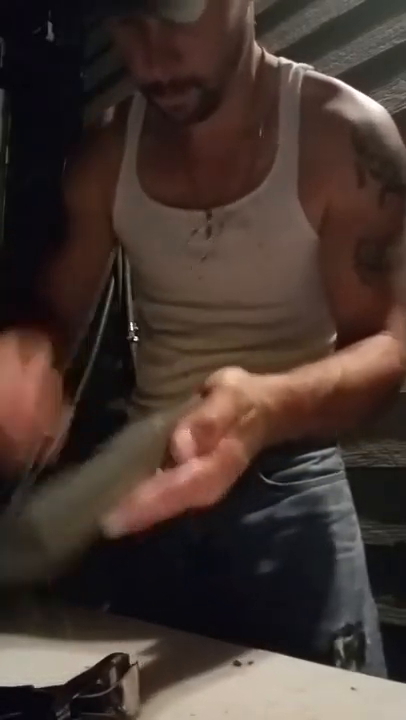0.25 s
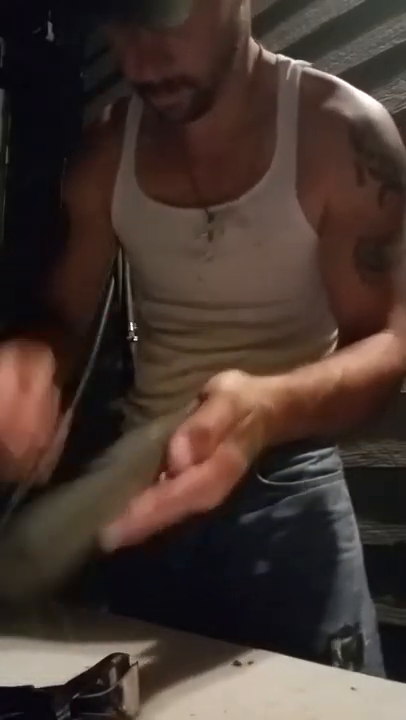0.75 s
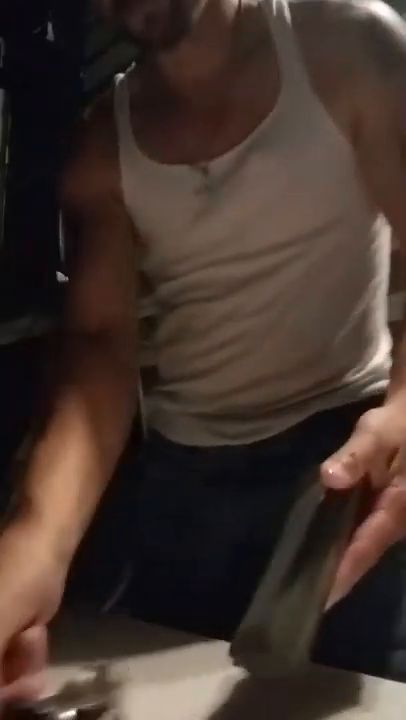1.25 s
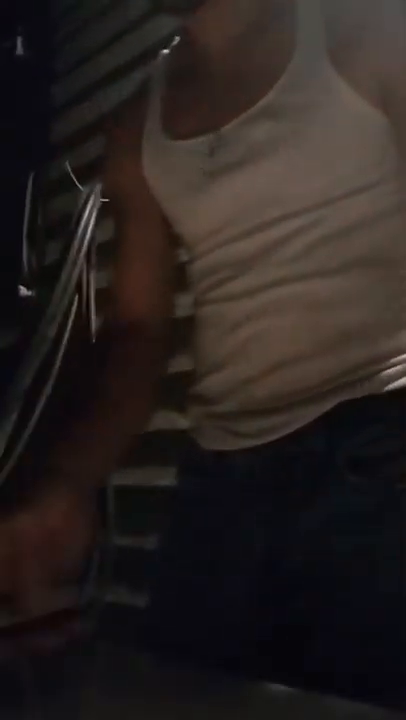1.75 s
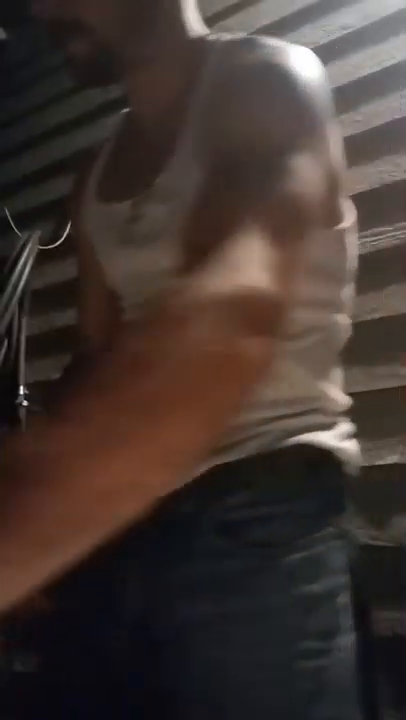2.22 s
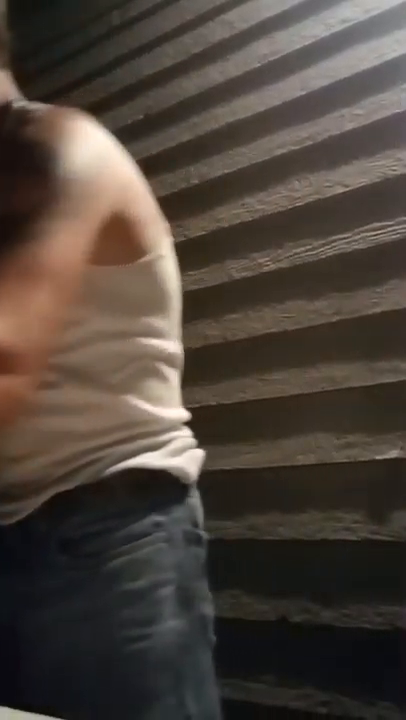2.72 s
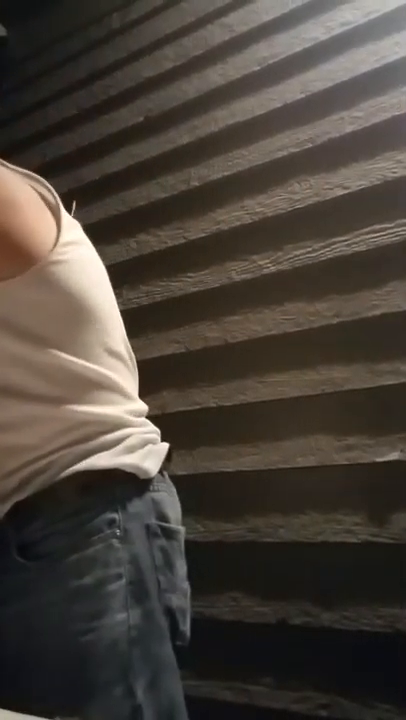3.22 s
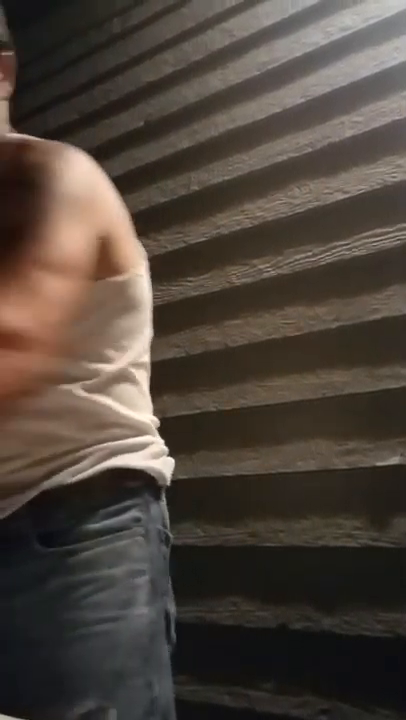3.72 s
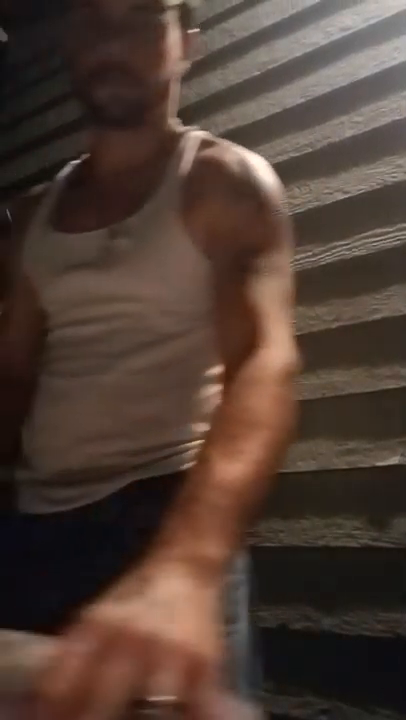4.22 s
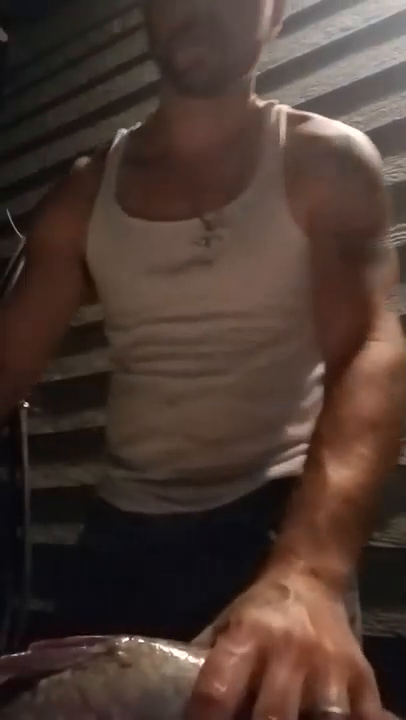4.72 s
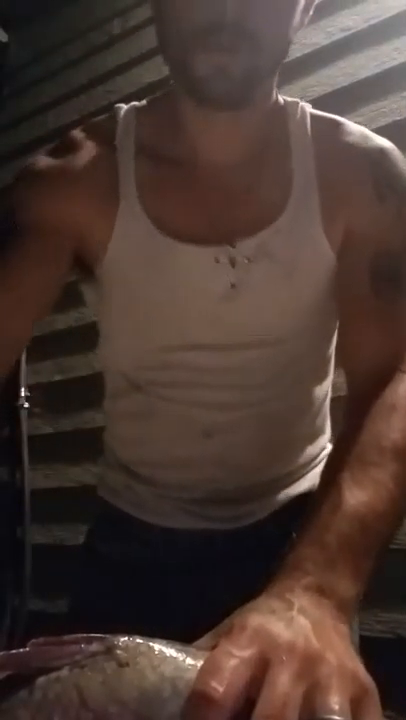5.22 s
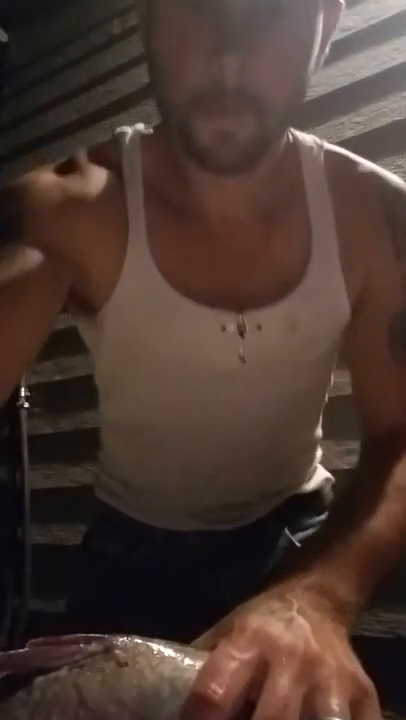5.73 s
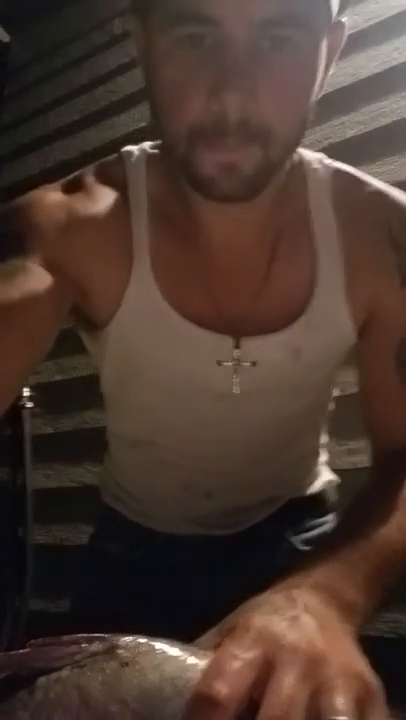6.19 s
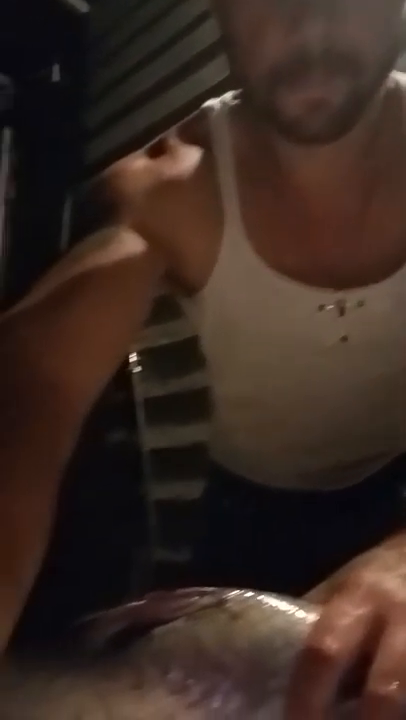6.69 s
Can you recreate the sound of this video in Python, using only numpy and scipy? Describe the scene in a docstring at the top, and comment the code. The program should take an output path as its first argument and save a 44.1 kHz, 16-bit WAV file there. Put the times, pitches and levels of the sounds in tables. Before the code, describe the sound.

Outdoors at night, insects shrill throughout over a distant motor's low hum. In the first second a knife rasps along a whetstone in four quick, gritty strokes with a slight steel ring. From about 1.2 to 2 seconds knife and stone clatter onto a booming table, loudest near 1.5 and 1.9 seconds, with short scuffs and one clink. At 2.3 seconds scales snap, and a large fish is shoved across the top with a rumbling, chattering rub that rattles loose things. Soft bumps follow near 3.1 and 3.5 seconds. The fish is pulled near with a scrape and crisp little snaps until about 4.5 seconds, then slaps down loudly and wetly at 4.8. Faint wet rubbing, two tiny squeaks and soft squishes follow until about 6.6 seconds. The microphone is close, on the table, with sounds leaning right; the background dips briefly after loud blows.

```python
"""Outdoors at night, at a fish-cleaning table: a knife rasps four times along a hand-held whetstone.
Knife and stone clatter down on the booming table top. A large fish is shoved away and pulled near, its
scales catching and slipping; it flops down wetly and a hand grips it. Insects shrill throughout over a
distant motor's hum. All is heard from a camera on the table: its right microphone port is the nearer
one, and its gain ducks after loud blows."""
import sys
import numpy as np
from scipy import signal
from scipy.fft import rfft, irfft, next_fast_len
from scipy.io import wavfile
from scipy.ndimage import uniform_filter1d, minimum_filter1d, map_coordinates

SR = 44100
rng = np.random.default_rng(int(sys.argv[2]) if len(sys.argv) > 2 else 0)


def wav_out(sig):
    """Save sig, one row per channel (or a flat mono array), as 16-bit PCM at SR to the path in sys.argv[1]."""
    wavfile.write(sys.argv[1], SR, np.round(np.clip(np.atleast_2d(sig).T, -1, 1) * 32767).astype(np.int16))


N = 306495

# Levels in the tables are relative; each layer sets its own gain.
# bands of the insect chorus: f/Hz, width/Hz, level/dB
INSECT_BANDS = [(2327, 54, -2.5), (3044, 257, -7), (4850, 760, -15), (6371, 317, 2), (6500, 310, 2.5)]
# far air and the motor's tones: f/Hz, level/dB
AIR_SPECTRUM = [(15, -56), (25, -24), (36, -14), (53, -0.5), (194, -7.5), (299, -4.5), (382, -10),
                (513, -10), (1640, -19.5), (2330, -12), (3680, -29), (5670, -24.5), (6490, -4.5),
                (7220, -29.5), (15800, -35.5)]
MOTOR_TONES = [(58, -3.5), (90, -6.5), (119, -5)]

# blade strokes: t/s, length/s, level/dB, mid-stroke swell/dB, fizz against the rasp/dB
STROKES = [(0.114, 0.086, -27, -4.5, -1.5), (0.374, 0.061, -23, 2.5, -2), (0.625, 0.078, -27.5, -9.5, -5),
           (0.87, 0.045, -22, 16, -5.5)]
# stone on steel: f/Hz, level/dB
GRIT_SPECTRUM = [(700, -8), (1200, -8), (2000, -11.5), (3000, -8), (5000, -4.5), (6100, 0.5), (7400, -7),
                 (8500, 3.5), (9600, -4), (10800, -8), (12500, -9), (15500, -7.5)]
# the blade's body and the steel's high modes: f/Hz, width/Hz, level/dB
BLADE_MODES = [(2720, 190, -8), (3320, 180, 0.5), (3600, 120, -1), (3670, 69, 4.5), (3940, 90, -5),
               (4110, 86, 2.5), (4510, 69, -14), (5800, 54, 1)]
EDGE_MODES = [(8700, 59, -21), (11470, 70, -6), (13400, 92, -3), (14100, 100, 0), (14505, 100, -21),
              (15240, 240, 5), (15430, 190, 9), (15450, 92, 10)]

# blows of stone and knife, and of the fish: t/s, force/dB, boom depth/dB, contact hardness/dB
KNOCKS = [(1.178, -16, 0, -17), (1.286, -9.5, 6.5, -11), (1.313, -2, -3, -6), (1.346, -8, -1, -4),
          (1.499, 13.5, -5, -1), (1.535, 5, -4, -1), (1.566, -2.5, -6, 10), (1.606, -4, -2, 0),
          (1.645, -9, -2, 1), (1.750, 3.5, 4, -1), (1.772, -4, 9, -2), (1.841, -11.5, 9.5, 1),
          (1.910, 11, -1, 5.5), (1.932, 15, -0.5, -5), (1.948, 9.5, -1, -1), (1.972, 3.5, 4, 7.5),
          (2.000, -2, 0, 7), (2.027, -11.5, 6, 17.5)]
FLOPS = [(3.149, -13, 4, -13), (3.494, -9.5, 2, -11), (3.519, -16, 6.5, -4), (4.779, 12.5, -5, -0.5),
         (4.846, 5, -8, -12.5), (4.900, 0, 0.5, 0)]
# the table top bare, the same under the fish, and the knife touching down: f/Hz, level/dB, t60/s
TABLE_MODES = [(80, -7, 0.18), (126.6, -1, 0.084), (158.3, 2.5, 0.15), (222, -3, 0.11), (303, 8.5, 0.14),
               (460, -1.5, 0.041), (555, -1.5, 0.11), (690, -7.5, 0.017)]
LOADED_TABLE_MODES = [(81.7, -9, 0.57), (114.7, -2.5, 0.44), (169, 6, 0.15), (253, -15, 0.081),
                      (334, -0.5, 0.073), (490, -12, 0.068), (650, -0.5, 0.086), (701, 8, 0.037)]
CLINK_MODES = [(3760, 8, 0.018), (4050, -17, 0.025), (5860, -9, 0.046), (7400, -27, 0.026)]
# the table's denser modes, a hard contact and its bright click: f/Hz, level/dB
THUD_SPECTRUM = [(120, -50), (200, 7), (273, -2), (313, -3.5), (370, -5.5), (424, -3.5), (976, -19),
                 (1500, -17), (1950, -43), (3300, -120)]
CLACK_SPECTRUM = [(410, -3.5), (700, -12), (861, -1), (1570, -1.5), (2130, -10), (2420, -6.5), (3140, -42),
                  (3590, -15), (6000, -43), (7800, -60), (13200, -120)]
CLICK_SPECTRUM = [(2500, -11), (4500, 3), (6500, -5), (8300, 5), (10500, -24), (16000, -6.5)]
# loose things on the table: f/Hz, width/Hz, level/dB
RATTLE_MODES = [(2503, 160, -5), (2840, 49, -3), (3020, 16, 1.5), (3320, 150, -6)]
# knife and stone sliding: t/s, length/s, table rumble/dB, scuff/dB
SCUFFS = [(1.266, 0.13, -19, -30.5), (1.525, 0.19, 2, -8), (1.778, .055, -7, -8)]

# snaps of scales and fins: t/s, level/dB
SNAPS = [(2.308, -13.5), (2.339, 1), (3.951, -12.5), (4.158, -5.5), (4.217, -4.5), (4.238, -7.5),
         (4.321, -3.5), (6.397, -23), (6.487, -15), (6.545, -19)]
# envelopes of the two drags: t/s, rub/dB, table rumble/dB
SHOVE_ENVELOPE = [(2.36, -46, -28), (2.46, -27, -23), (2.77, -21, -19), (2.82, -27, -16.5),
                  (2.89, -22, -17.5), (2.98, -27, -22.5), (3.07, -25, -20.5), (3.18, -33, -21),
                  (3.32, -47.5, -41.5), (3.46, -71, -73)]
PULL_ENVELOPE = [(3.55, -47.5, -32.5), (3.72, -40.5, -40), (3.88, -32, -50), (3.955, -23.5, -43),
                 (4.0, -28, -37), (4.10, -21, -36.5), (4.205, -31, -32), (4.23, -22.5, -28),
                 (4.37, -30, -32), (4.6, -45, -40), (4.7, -51, -37), (4.77, -57, -54)]
# each drag's table rumble and scale rub: f/Hz, level/dB
SHOVE_RUMBLE = [(100, -5), (170, 1), (300, 0), (430, -3.5), (620, -5), (800, -9), (1100, -16)]
SHOVE_RUB = [(380, -7), (650, -14.5), (1010, -1.5), (1250, -7), (1510, -4.5), (2060, -13), (2500, -3.5),
             (3320, -20), (3740, -19), (5800, -19.5), (7540, -39), (12800, -120)]
PULL_RUMBLE = [(35, -52), (60, -2), (140, -11), (189, 5.5), (248, -7.5), (336, -4), (465, -12.5),
               (800, -24), (1040, -9.5), (1760, -120)]
PULL_RUB = [(350, -29), (600, -10.5), (720, -15), (863, -7.5), (1100, -7.5), (1590, -2), (1720, -6),
            (1910, -3.5), (2100, -14.5), (2490, -4), (2830, -13), (3590, -9), (4140, -19), (5900, -25),
            (7670, -55), (13000, -120)]
# a snap, the hiss of wet skin and the body's slap: f/Hz, level/dB
SNAP_SPECTRUM = [(300, 0.5), (1200, -3), (2600, 4.5), (4500, -3.5), (6500, -9.5), (8500, -5.5),
                 (11000, -27), (16000, -10)]
WET_SPECTRUM = [(3500, -20), (5500, -15.5), (7200, -1.5), (8400, 5), (10500, -18.5), (13000, -12.5),
                (15500, -5)]
SLAP_SPECTRUM = [(150, -4), (270, 4), (450, 5), (700, -4.5), (1000, -12.5), (1500, -12.5)]
# scales singing on the table top: f/Hz, width/Hz, level/dB
SCALE_MODES = [(1260, 117, 1.5), (1474, 100, 2), (1602, 54, 6), (1940, 53, -5), (3970, 210, -5),
               (4660, 820, -10)]
# spells of skin chatter, hand rub and finger pressure: middle t/s, half length/s, level/dB
CHATTER_SPELLS = [(2.482, 0.033, -9.5), (2.66, 0.19, -18.5), (3.15, 0.11, -31)]
GRIPS = [(5.02, 0.089, -48), (5.48, 0.18, -48), (5.82, 0.06, -50.5), (6.41, .04, -48), (6.54, 0.036, -60)]
SQUISHES = [(6.41, 0.076, -43.5), (6.53, 0.066, -38)]
# faint squeaks: t/s, f/Hz, level/dB
SQUEAKS = [(5.221, 1710, -36), (5.247, 1690, -35.5)]

# stereo likeness of far and near sounds: f/Hz, left-right correlation
OPEN_ALIKE = [(100, 0.95), (500, 1), (1200, 0.24), (2500, 0.024)]
NEAR_ALIKE = [(100, 0.89), (500, 0.64), (1400, 0.15), (3000, 0.55)]
# pan of the surroundings, the table and the whetstone: f/Hz, left minus right/dB
OPEN_PAN = [(100, 0), (500, -4), (2000, -4), (6500, -7.5), (14000, -3)]
TABLE_PAN = [(100, 0.5), (400, -8), (1500, -12), (3500, -7), (8000, -19), (14000, -8)]
STONE_PAN = [(1500, -3), (4000, -2), (8000, -11), (15000, -7.5)]
# decay of the reflections from wall and eaves: f/Hz, t60/s
WALL_DECAY = [(150, 0.23), (600, 0.061), (3000, 0.09), (12000, 0.033)]


def amp(db):
    """Decibels to gain."""
    return 10 ** (np.asarray(db) / 20)


def clock():
    """The time of every sample."""
    return np.arange(N) / SR


def along(points, hz):
    """Read (f/Hz, value) points on a log axis."""
    f, value = np.transpose(points)
    return np.interp(np.log(hz + 1), np.log(f + 1), value)


def wobble(rate):
    """A smooth random curve, rate knots a second."""
    return map_coordinates(rng.standard_normal(int(N * rate / SR) + 4), [clock() * rate])


def filtered(x, response):
    """Shape x with a frequency response."""
    size = next_fast_len(N + SR // 2)
    return irfft(rfft(x, size) * response(np.fft.rfftfreq(size, 1 / SR)), size)[..., :N]


def colour(points):
    """An EQ curve through (f/Hz, level/dB) points, falling steeply beyond its ends."""
    low, high = points[0][0], points[-1][0]
    return lambda f: amp(along(points, f)) * np.minimum(f / low, 1) ** 3 / np.maximum(f / high, 1) ** 3


def resonances(modes):
    """A bank of (f/Hz, width/Hz, level/dB) resonators of alternating polarity."""
    return lambda f: sum((-1) ** k * amp(db) * 1j * f * width / (hz * hz - f * f + 1j * f * width)
                         for k, (hz, width, db) in enumerate(modes))


def ports(balance_db):
    """Left and right gains for a level difference."""
    left = np.atleast_1d(amp(balance_db))
    return np.array([left, np.ones_like(left)]) * 2 / (1 + left)


def patches(x, depth_db):
    """Shifting contact points favour now these, now those frequencies."""
    spectra = signal.stft(x, nperseg=1024)[2]
    field = uniform_filter1d(rng.standard_normal(spectra.shape[1:]), size=4, axis=0)
    field = uniform_filter1d(field, size=3, axis=1)
    return signal.istft(spectra * amp(depth_db * field / field.std()), nperseg=1024)[1][:, :N]


def texture(response, pan, grain_db=0, patchy_db=0, alike=NEAR_ALIKE):
    """Stereo noise with a mid of rms 1: micro-impacts of uneven size excite a response."""
    def mid_side(f):
        angle = np.arccos(np.clip(along(alike, f), -1, 1)) / 2
        return response(f) * np.array([np.cos(angle), np.sin(angle)])

    impacts = rng.standard_normal((2, N)) * amp(grain_db * wobble(1500))
    if patchy_db:
        impacts = patches(impacts, patchy_db)
    mid, side = filtered(impacts, mid_side)
    stereo = filtered(np.array([mid + side, mid - side]), lambda f: ports(along(pan, f)))
    return stereo / np.sqrt(np.mean(stereo.mean(0) ** 2) + 1e-20)


def add(track, start, sound):
    """Mix a sound into a track at start seconds."""
    part = track[..., round(start * SR):][..., :sound.shape[-1]]
    part += sound[..., :part.shape[-1]]


def faders(rows):
    """One gain curve for each dB column, silent outside the rows' times."""
    times, *columns = np.transpose(rows)
    return [amp(np.interp(clock(), times, db, left=-120, right=-120)) for db in columns]


def swells(rows):
    """The envelope of smooth (t/s, half length/s, level/dB) swells."""
    return sum(amp(db) * np.exp(-((clock() - middle) / half) ** 2) for middle, half, db in rows)


def blows(times, levels_db, t60, attack):
    """The envelope of blows that each rise fast and die away; their powers add."""
    power, t = np.zeros(N), np.arange(SR // 2) / SR
    for start, db in zip(times, levels_db):
        add(power, start, (amp(db - 60 * t / t60) * (1 - np.exp(-t / attack))) ** 2)
    return np.sqrt(power)


def ring(modes, scatter_db, detune):
    """One strike of (f/Hz, level/dB, t60/s) modes, weighted anew by where it lands."""
    t = np.arange(SR // 2) / SR
    chance = rng.standard_normal((len(modes), 2))
    return sum(amp(db + scatter_db * lift - 60 * t / t60) * np.sin(2 * np.pi * hz * (1 + detune * bend) * t)
               for (hz, db, t60), (lift, bend) in zip(modes, chance))


def night():
    """The bed: a flickering insect chorus, far air and a distant motor's wavering hum."""
    insects = texture(resonances(INSECT_BANDS), OPEN_PAN, grain_db=2, alike=OPEN_ALIKE)
    insects *= amp(1.84 * wobble(45))
    air = texture(colour(AIR_SPECTRUM), OPEN_PAN, alike=OPEN_ALIKE)
    hum = sum(np.sin(2 * np.pi * hz * clock() + 0.66 * wobble(12)) * amp(db + 2.7 * wobble(12))
              for hz, db in MOTOR_TONES)
    return amp(-44 + 0.5 * wobble(2.45)) * (amp(1) * insects + amp(4) * air + amp(1.5) * hum)


def sharpening(attack_s=0.0024, release_t60=0.072):
    """The blade taps the stone, then grit rasps along the edge and rings the steel."""
    rasp, body, fizz = np.zeros((3, N))
    for start, length, level_db, swell_db, fizz_db in STROKES:
        t = clock() - start
        pressure_db = swell_db * (np.sin(0.85 * np.pi * np.clip(t / length, 0, 1) ** 1.17) - 0.5)
        release_db = 60 * np.maximum(t - length, 0) / release_t60
        contact = np.clip(t / attack_s, 0, 1) * amp(level_db + pressure_db - release_db)
        rasp += contact
        body += amp(-8.5 + 0.17 * swell_db) * contact  # pressing harder rings the steel more
        fizz += amp(fizz_db) * contact
    times, _, level_db, swell_db, _ = np.transpose(STROKES)
    tap_db = level_db + 8.5 - 0.16 * swell_db  # a stroke that swells later lands more lightly
    tap = blows(times, tap_db, t60=0.013, attack=0.00027)
    return ((rasp + tap) * texture(colour(GRIT_SPECTRUM), STONE_PAN, grain_db=4.5, patchy_db=2.5)
            + (body + amp(-5) * tap) * texture(resonances(BLADE_MODES), STONE_PAN, grain_db=3.5)
            + (fizz + amp(-4) * tap) * texture(resonances(EDGE_MODES), STONE_PAN))


def rebounds(rows, flight_s, loss_db, soften_db, count):
    """Each landing becomes count quick contacts, weaker and softer as the thing rocks to rest."""
    return [(start + k * flight_s, force - k * loss_db, depth, hardness - k * soften_db)
            for start, force, depth, hardness in rows for k in range(count)]


def table_hits(rows, modes, thud_spectrum, boom_db, knock_db, thud_db, click_db, thud_t60, clack_t60):
    """Each blow booms and thuds in the table top; hard contacts add a clack, a rattle and a click."""
    times, force_db, depth_db, hardness_db = np.transpose(rows)
    boom = np.zeros(N)
    for start, force, depth in zip(times, force_db, depth_db):
        shelf = [(190, depth + boom_db), (300, knock_db)]  # deep blows favour low modes: f/Hz, level/dB
        struck = [(hz, force + db + along(shelf, hz), t60) for hz, db, t60 in modes]
        add(boom, start, ring(struck, scatter_db=1.5, detune=0.017))
    thud = blows(times, force_db + thud_db, t60=thud_t60, attack=0.0015)
    clack = blows(times, force_db + hardness_db - 15.5, t60=clack_t60, attack=0.00042)
    click = blows(times, force_db + hardness_db + click_db, t60=0.021, attack=0.00022)
    return (ports(-5.5) * boom
            + thud * texture(colour(thud_spectrum), TABLE_PAN, patchy_db=5)
            + clack * texture(colour(CLACK_SPECTRUM), TABLE_PAN, grain_db=2.5)
            + amp(-2.5) * clack * texture(resonances(RATTLE_MODES), OPEN_PAN)
            + click * texture(colour(CLICK_SPECTRUM), TABLE_PAN, grain_db=-2.5))


def clatter(clink_at_s=1.8435):
    """Stone and knife land and rock on the table; the steel clinks once."""
    clink = np.zeros(N)
    add(clink, clink_at_s, amp(-10) * ring(CLINK_MODES, scatter_db=1, detune=0.0017))
    contacts = rebounds(KNOCKS, flight_s=0.00783, loss_db=6, soften_db=1.5, count=2)
    knocks = table_hits(contacts, TABLE_MODES, THUD_SPECTRUM, boom_db=-10, knock_db=-22,
                        thud_db=-8, click_db=-21, thud_t60=0.11, clack_t60=0.025)
    return ports(-8.5) * clink + knocks


def scuffs(attack_s=0.0087, fade_db_per_s=93, release_t60=0.16):
    """Stone and knife slide a little, lose speed and stop, and loose things buzz."""
    rumble, scuff = np.zeros((2, N))
    for start, length, rumble_db, scuff_db in SCUFFS:
        t = np.maximum(clock() - start, 0)
        release_db = 60 * np.maximum(t - length, 0) / release_t60
        slide = np.minimum(t / attack_s, 1) * amp(-fade_db_per_s * t - release_db)
        rumble += amp(rumble_db) * slide
        scuff += amp(scuff_db) * slide
    table_top = resonances([(hz, np.log(1000) / np.pi / t60, db) for hz, db, t60 in TABLE_MODES])
    return (amp(-4.5) * rumble * texture(table_top, TABLE_PAN, grain_db=2.5)
            + amp(-5.5) * scuff * texture(colour(CLACK_SPECTRUM), TABLE_PAN, grain_db=-0.5, patchy_db=3)
            + amp(-10) * scuff * texture(resonances(RATTLE_MODES), OPEN_PAN, grain_db=6.5)
            + amp(-18) * scuff * texture(colour(CLICK_SPECTRUM), TABLE_PAN, grain_db=6.5))


def fin_snaps():
    """Scales and fins snap in tiny, crisp bursts."""
    times, level_db = np.transpose(SNAPS)
    bursts = blows(times, level_db - 6.5, t60=0.008, attack=0.0001)
    return bursts * texture(colour(SNAP_SPECTRUM), TABLE_PAN)


def drag(envelope, rumble_spectrum, rub_spectrum, slip_db, rumble_db, rub_db, hiss_db):
    """Scales catch and slip on the table top, which rumbles under them; a wet hiss follows the rub."""
    rub, rumble = faders(envelope)
    rub *= amp(-0.5 * wobble(16))  # a drag never runs evenly
    table = texture(colour(rumble_spectrum), TABLE_PAN, grain_db=slip_db, patchy_db=3.5)
    scales = texture(colour(rub_spectrum), TABLE_PAN, grain_db=slip_db, patchy_db=3.5)
    wetness = amp(hiss_db + wobble(13))  # the skin is wetter in some places
    hiss = texture(colour(WET_SPECTRUM), TABLE_PAN, grain_db=4)
    return amp(rumble_db) * rumble * table + rub * (amp(rub_db) * scales + wetness * hiss)


def shove():
    """The fish is shoved away, shaking loose things on the table."""
    slide = drag(SHOVE_ENVELOPE, SHOVE_RUMBLE, SHOVE_RUB,
                 slip_db=2.5, rumble_db=0, rub_db=1, hiss_db=-14.5)
    rub, _ = faders(SHOVE_ENVELOPE)
    jolts = np.abs(wobble(120))
    return slide + amp(-6) * rub * jolts * texture(resonances(RATTLE_MODES), OPEN_PAN)


def skin_chatter(slip_hz=330, fall_octaves_per_s=1.6):
    """Wet skin sticks and slips at an unsteady rate that falls as the shove goes on."""
    since_first = np.maximum(clock() - CHATTER_SPELLS[0][0], -0.1)
    pitch = slip_hz * 2 ** (-fall_octaves_per_s * since_first) * (1 + 0.09 * wobble(70))
    tone = np.sin(2 * np.pi * np.cumsum(pitch) / SR)
    return ports(-9) * swells(CHATTER_SPELLS) * amp(2.8 * wobble(50)) * tone


def flops():
    """The fish slaps the table and wobbles down; only a hard slap squirts water from under the skin."""
    contacts = rebounds(FLOPS, flight_s=0.014, loss_db=7.5, soften_db=5, count=3)
    slaps = table_hits(contacts, LOADED_TABLE_MODES, SLAP_SPECTRUM, boom_db=-17.5, knock_db=-23,
                       thud_db=-12.5, click_db=-18.5, thud_t60=0.15, clack_t60=0.05)
    times, force_db, *_ = np.transpose(FLOPS)
    squirt = blows(times, -45.5 + 2.8 * force_db, t60=0.13, attack=0.0008)
    spatter = texture(colour(SNAP_SPECTRUM), TABLE_PAN, grain_db=6.5)
    spray = amp(-15) * texture(colour(WET_SPECTRUM), TABLE_PAN)
    return slaps + squirt * (spatter + spray)


def pull():
    """The fish is pulled near, its scales singing on the table top."""
    slide = drag(PULL_ENVELOPE, PULL_RUMBLE, PULL_RUB,
                 slip_db=1.5, rumble_db=-0.5, rub_db=-3, hiss_db=-12.5)
    rub, _ = faders(PULL_ENVELOPE)
    return slide + amp(-2.5) * rub * texture(resonances(SCALE_MODES), TABLE_PAN, grain_db=5.5)


def grips():
    """A hand rubs over wet scales with a grainy hiss."""
    return swells(GRIPS) * texture(colour(WET_SPECTRUM), OPEN_PAN, grain_db=5)


def squeaks(half_length_s=0.0065):
    """Two tiny squeaks, each a rough tone with its octave."""
    track = np.zeros(N)
    for middle, hz, db in SQUEAKS:
        phase = 2 * np.pi * hz * clock() + 1.4 * wobble(330)
        track += swells([(middle, half_length_s, db)]) * (np.sin(phase) + 1.4 * np.sin(2 * phase))
    return track


def squishes():
    """Fingers press into the flesh with a soft crackle."""
    return swells(SQUISHES) * texture(colour(SNAP_SPECTRUM), OPEN_PAN, grain_db=6)


def arrival(x, lag_s):
    """A sound reaches the left port lag_s after the right one."""
    return filtered(x, lambda f: np.exp(1j * np.pi * f * lag_s * np.array([[-1], [1]])))


def wall(x):
    """The short answer of the wall and eaves: a noise tail that lasts longest in the bass."""
    hz, t, spectra = signal.stft(rng.standard_normal((2, SR // 2)), SR, nperseg=256)
    decay = amp(-60 * t / along(WALL_DECAY, hz)[:, None])
    tail = signal.istft(spectra * decay, SR, nperseg=256)[1]
    return signal.fftconvolve(x, tail / np.linalg.norm(tail[0]), axes=1)[:, :N]


def gain_control(x, threshold_db=-17, share=0.63, hold_s=0.44, recover_db_per_s=17.5, keen_above_hz=6050):
    """Loud sounds, bright ones most, duck the gain at once; it holds, then creeps back up."""
    sidechain = filtered(x.mean(0), lambda f: np.hypot(1, f / keen_above_hz))
    level_db = 10 * np.log10(np.abs(uniform_filter1d(sidechain ** 2, size=SR // 50)) + 1e-12)
    duck_db = np.maximum(share * (level_db - threshold_db), 0)
    duck_db[0] = 5.5  # it starts a little turned down
    hold = int(hold_s * SR)
    held_db = -minimum_filter1d(-duck_db, hold, origin=(hold - 1) // 2)
    recovery_db = recover_db_per_s * clock()
    released_db = np.maximum.accumulate(held_db + recovery_db) - recovery_db
    return x * amp(-uniform_filter1d(released_db, size=SR // 200))


def scene():
    """The close work, its reflection and the night around it."""
    whetstone = arrival(sharpening(), lag_s=0.00002)  # held almost straight ahead
    tools = clatter() + scuffs()
    fish = fin_snaps() + shove() + skin_chatter() + flops() + pull() + grips() + squishes()
    near = whetstone + arrival(tools + fish + squeaks(), lag_s=0.0001)
    return near + amp(-15.5) * wall(near) + night()


def record(dry, low_cut_hz=46, high_cut_hz=15800):
    """The camera thins the deepest bass, rides its gain, rounds off the peaks and cuts the very top."""
    thinned = signal.sosfilt(signal.butter(4, low_cut_hz, "highpass", fs=SR, output="sos"), dry)
    ridden = gain_control(thinned)
    rounded = ridden / (1 + ridden ** 6) ** (1 / 6)
    return filtered(rounded, lambda hz: 1 / np.sqrt(1 + (hz / high_cut_hz) ** 200))


dry = scene()
out = record(dry)
wav_out(out)
```